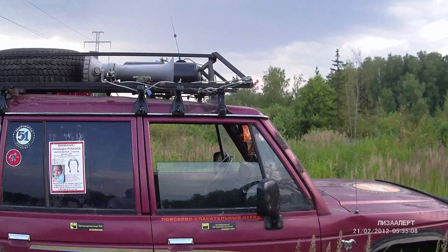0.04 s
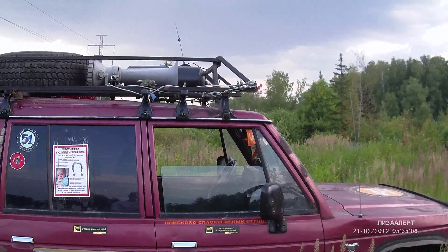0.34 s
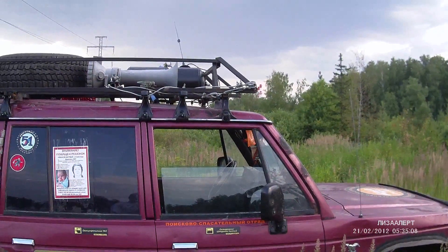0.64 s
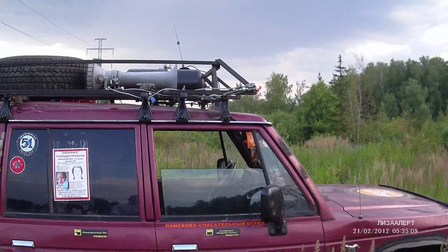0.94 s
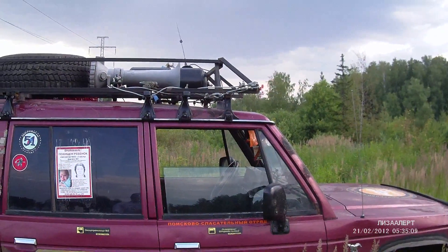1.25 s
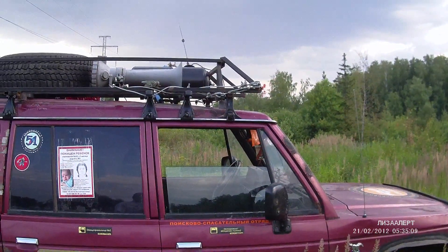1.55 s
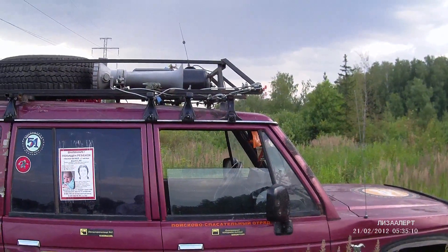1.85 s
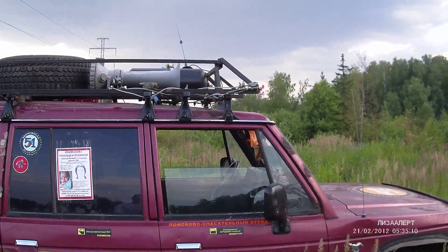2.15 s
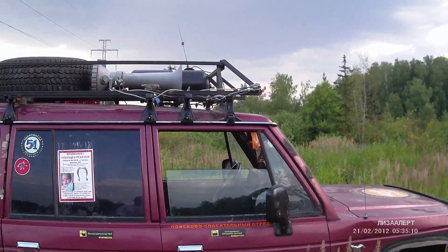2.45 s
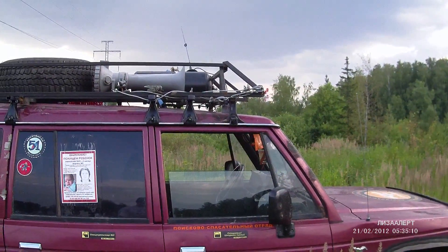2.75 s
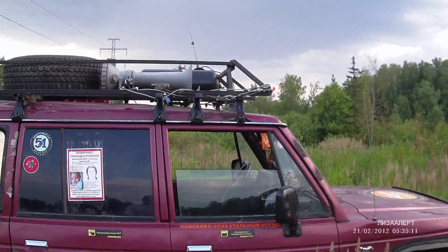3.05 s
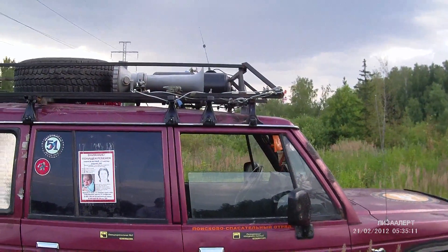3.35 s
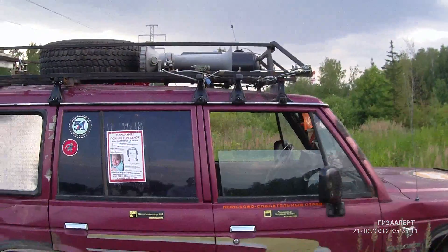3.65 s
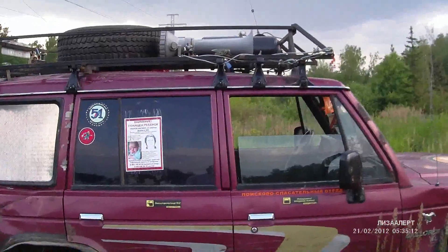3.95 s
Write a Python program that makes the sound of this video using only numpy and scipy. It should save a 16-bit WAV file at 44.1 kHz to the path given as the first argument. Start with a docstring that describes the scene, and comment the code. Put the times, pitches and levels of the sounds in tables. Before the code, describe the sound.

A very loud, low air horn blares from an off-road car, close and distorted. As its air runs out, the note sags into a weak hissing buzz and stops, leaving the diesel engine idling with light metal rattles outdoors.

```python
"""An air horn on the roof of an off-road car, close to the microphone in an open field, overloads it.
Its diaphragm chops the air; as the air runs down the note sags, breaks with a rasp,
drops into a weak hissing buzz and stops. The car's four-cylinder diesel idles underneath,
shaking loose metal, and is left knocking alone."""
import sys
import numpy as np
from scipy import signal
from scipy.fft import rfft, irfft
from scipy.io import wavfile
from scipy.ndimage import uniform_filter1d, map_coordinates

SR = 44100
rng = np.random.default_rng(int(sys.argv[2]) if len(sys.argv) > 2 else 0)


def to_wav(sig):
    """Store sig (one row per channel, or 1-D mono) as 16-bit WAV at the path in sys.argv[1].

    Samples outside -1..1 are clipped; the rate is SR.
    """
    pcm = np.clip(np.atleast_2d(sig), -1, 1) * 32767
    pcm = np.round(pcm).astype(np.int16)
    wavfile.write(sys.argv[1], SR, pcm.T)  # frames by channels


N = 176400
TIME = np.arange(N) / SR

# pitch of the diaphragm, which follows the air pressure: t/s, f/Hz
HORN_PITCH = [(0, 130.5), (.85, 130.3), (1.5, 129.2), (1.83, 128), (1.89, 127.1), (1.928, 120.4),
              (1.96, 110.3), (2.04, 109.2), (2.135, 104.2), (2.255, 103.9), (2.33, 100.6), (2.63, 99.3),
              (2.87, 96.7), (2.93, 94.3)]
# loudness of the horn: t/s, low overtones/dB, treble/dB
HORN_LEVEL = [(0, -1.5, -16.5), (1.3, -1.5, -14.5), (1.63, 0, -14), (1.83, 0.5, -10.5), (1.905, -6, -14),
              (1.945, -14.5, -23), (2.13, -21.5, -31), (2.21, -18.5, -26.5), (2.31, -21.5, -31),
              (2.68, -22.5, -31), (2.8, -25.5, -34.5), (2.9, -27, -35)]
# unsteadiness and escaping air: t/s, timing jitter/ms, hiss/dB
HORN_AIR = [(0, 0.0049, -29), (1.3, 0.0055, -27), (1.65, .012, -28), (1.84, .005, -23), (1.9, 0.02, -20.5),
            (1.945, 0.073, -18.5), (1.99, .018, -27), (2.2, .005, -28), (2.32, 0.018, -29.5),
            (2.5, .004, -33), (2.9, .009, -35)]
# the diaphragm's registers 0-5, from full pressure down, fundamental first: relative level/dB
FULL_DB = [2, -4.5, -4, -33, -10, -11, -16, -12.5, -15.5, -24, -29, -22.5, -21, -29, -19.5, -18]
EASING_DB = [1, -8.5, -2.5, -25.5, -23, -6.5, -12, -15.5, -14.5, -11, -19, -24, -19.5, -16, -26, -29]
SAGGING_DB = [0.5, -9.5, -0.5, -18.5, -11, -10.5, -10, -27, -20.5, -14.5, -33, -21, -26, -24, -21.5, -18.5]
STRAINED_DB = [1.5, -10, -0.5, -24, -11.5, -27, -22.5, -18.5, -24, -17.5, -23, -22, -15.5, -11, -19, -24]
SLACK_DB = [0, -13.5, -6.5, -4.5, -9, -3, -8, -6.5, -11, -8, -29, -9.5, -7.5, -10.5, -6.5, -2, -2, -7,
            -11.5]
SPENT_DB = [-3, -1.5, -16, -5, -21, -15, 1.5, -12, -3.5, -3, -2.5, -21, -11, -14, -9.5, -13, -6.5, -1.5, -8,
            -11, -12]
# the horn's path through them: t/s, register
REGISTER_PATH = [(.15, 0), (1.05, 1), (1.35, 2), (1.6, 3), (1.7, 3), (1.89, 2.5), (1.96, 4), (2.25, 4),
                 (2.32, 5)]
# outline of the treble overtones, blaring and dying: f/Hz, relative level/dB
BLARE_TREBLE = [(2190, -16), (2560, -2), (2980, -7.5), (3340, -4.5), (3950, -4.5), (4980, -6), (5840, -28),
                (6950, -10), (7900, -10), (8550, -9.5), (9290, -15), (15300, -16)]
BUZZ_TREBLE = [(2000, 0), (2370, -13), (2700, 1), (2960, -14), (3350, -4.5), (4080, -2), (4900, -13.5),
               (5800, -42), (7200, -10), (9400, -14), (10300, -5.5), (12000, -27.5), (13700, -6.5),
               (15300, -17)]
# a sharp ring that steps down through the overtones as the pressure falls: t/s, f/Hz, added level/dB
TREBLE_RING = [(.5, 4330, 3.5), (.95, 3890, 1), (1.27, 3630, 10.5), (1.52, 3216, 7), (1.82, 3300, 9),
               (1.93, 3340, -17)]
# air through the horn: f/Hz, relative level/dB
HISS_SPECTRUM = [(200, -2.5), (480, -7), (750, 0), (1300, -4.5), (1800, -1), (2500, -6), (3500, -2.5),
                 (4900, -6.5), (6000, -19), (7800, -4.5), (9400, -18), (12000, -26), (14000, -53)]
# horn resonances that flare as the note fails: t/s, half length/s, f/Hz, width/Hz, added level/dB
HORN_FLARES = [(1.45, 0.42, 8540, 900, 0), (1.6, 0.97, 4846, 110, 0), (1.893, 0.053, 845, 170, 8.5),
               (2.05, 0.059, 650, 80, 2), (2.26, 0.82, 3340, 65, 0)]

# the four cylinders: boom/dB, clatter/dB, tick/dB
CYLINDER_LEVELS = [(-50, -36.5, -42.5), (-45, -30, -39.5), (-29, -33, -40.5), (-54, -34, -42)]
# midrange and treble of a knock: f/Hz, relative level/dB
CLATTER_SPECTRUM = [(500, -33), (750, -3), (1250, 4.5), (1600, -0.5), (2100, 1), (2700, -12.5), (5000, -42)]
TICK_SPECTRUM = [(1200, -27), (2600, -5), (3300, 3.5), (4200, -12.5), (6000, -28), (8700, -8), (10300, -5),
                 (12000, -20), (14000, -4), (15300, -15)]
# steady wash of the running engine: f/Hz, relative level/dB
WASH_SPECTRUM = [(60, -32), (150, 8), (340, 2.5), (470, -9), (640, 2), (2100, -6.5), (2700, -13),
                 (4000, -19.5), (6000, -33.5), (10000, -18.5), (12000, -28), (14000, -23)]
# bright clanks of loose metal: t/s, level/dB
CLANK_HITS = [(2.312, -21), (3.201, -30.5), (3.354, -30.5), (3.505, -29.5), (3.81, -27.5), (3.961, -29)]
# resonances of that metal: f/Hz, width/Hz, gain/dB
METAL_MODES = [(1990, 450, -2), (10040, 440, -15.5), (14000, 600, -17)]

TREBLE_FROM_HZ, CUTOFF_HZ = 2150, 15400


def horn():
    """On the roof, close by: the diaphragm chops the air, and treble and hiss puff once a cycle."""
    stop_s, release_s, sputter_db = 2.885, 0.067, 1.65
    hz, = in_time(HORN_PITCH)
    low_db, treble_db = in_time(HORN_LEVEL)
    jitter_ms, hiss_db = in_time(HORN_AIR)
    slip_s = jitter_ms / 1000 * drift(rate_hz=310)
    cycles = np.cumsum(hz) / SR + hz * slip_s
    opening = -np.cos(2 * np.pi * cycles)
    low_heights, treble_heights = overtones()
    low = from_db(low_db) * play(low_heights, cycles)
    treble = from_db(treble_db) * play(treble_heights, cycles) * unit_rms(1 + 0.25 * opening)
    sputter = from_db(sputter_db * broken() * drift(rate_hz=15))
    hiss = from_db(hiss_db) * noise(HISS_SPECTRUM) * unit_rms(1 + 0.12 * opening)
    release = np.clip(1 - (TIME - stop_s) / release_s, 0, 1)
    return flare(sputter * (low + treble) + hiss) * release


def overtones(count=165, moments=200):
    """Low and treble overtones as the pressure falls: complex heights, overtones x moments."""
    ring_width_hz, smear_from_hz, smear_full_hz = 108, 330, 740
    ripple_db, ripple_rad, ripple_spacing_hz = 3.5, 0.44, 127
    t = np.linspace(0, N / SR, moments)
    hz = np.arange(1, count + 1)[:, None] * in_time(HORN_PITCH, t)[0]
    register, = in_time(REGISTER_PATH, t)
    low = 0
    for index, levels_db in enumerate((FULL_DB, EASING_DB, SAGGING_DB, STRAINED_DB, SLACK_DB, SPENT_DB)):
        heights = np.pad(from_db(levels_db), (0, count - len(levels_db)))
        low = low + unit_power(heights[:, None]) * np.maximum(1 - abs(register - index), 0)
    dying = broken(t)
    treble = from_db((1 - dying) * at_hz(BLARE_TREBLE, hz) + dying * at_hz(BUZZ_TREBLE, hz))
    treble *= (hz > TREBLE_FROM_HZ) & (hz < CUTOFF_HZ)
    ring_hz, ring_db = in_time(TREBLE_RING, t)
    treble *= 1 + from_db(ring_db) / (1 + (2 * (hz - ring_hz) / ring_width_hz) ** 2)
    # the sagging overtones slide through the bell's fine peaks and dips, drawn in 1 Hz steps
    swell, turn = drift(1 / ripple_spacing_hz, 1, (2, SR))[:, hz.astype(int)]
    treble *= from_db(ripple_db * swell)
    # the bell scatters the higher overtones over the cycle
    smear = np.clip((hz[:, :1] - smear_from_hz) / (smear_full_hz - smear_from_hz), 0, 1)
    phase = smear * (rng.uniform(-np.pi, np.pi, (count, 1)) + ripple_rad * turn) - np.pi / 2
    return [unit_power(part) * np.exp(1j * phase) for part in (low, treble)]


def broken(t=TIME):
    """0 while the note holds, 1 once it has dropped into the slack buzz."""
    return np.clip(in_time(REGISTER_PATH, t)[0] - 3, 0, 1)


def flare(plain):
    """Each resonance of the horn swells and fades on top of the plain sound."""
    out = plain
    for at_s, half_s, hz, width_hz, gain_db in HORN_FLARES:
        swell = np.exp(-((TIME - at_s) / half_s) ** 2)
        out = out + from_db(gain_db) * swell * resonate(plain, hz, width_hz)
    return out


def diesel():
    """Under the horn: each cylinder knocks in its own colour, booms the car and thumps the exhaust."""
    firing_s, interval_s, knock_lead_s = 3.2128, .03803, 0.013   # any one firing sets the beat
    knock_rise_s, knock_decay_s, slap_after_s = 0.0045, 0.0085, 0.0079
    boom_hz, wash_db = 224, -36.5
    thump_db, thump_width_s, low_cut_hz = -26.5, 0.0015, 13
    boom_db, clatter_db, tick_db = np.transpose(CYLINDER_LEVELS)
    ages = (TIME - firing_s + knock_lead_s - np.arange(4)[:, None] * interval_s) % (4 * interval_s)
    booms = burst(ages, rise_s=0.011, decay_s=0.017) * np.sin(2 * np.pi * boom_hz * ages)
    slaps = .6 * burst(ages - slap_after_s, knock_rise_s, knock_decay_s)   # a second contact
    knocks = np.hypot(burst(ages, knock_rise_s, knock_decay_s), slaps)
    wash = from_db(wash_db) * noise(WASH_SPECTRUM)
    clatter = noise(CLATTER_SPECTRUM) * (from_db(clatter_db) @ knocks)
    ticks = noise(TICK_SPECTRUM) * (from_db(tick_db) @ knocks)
    from_firing_s = (((TIME - firing_s) / interval_s + .5) % 1 - .5) * interval_s
    pulses = np.exp(-.5 * (from_firing_s / thump_width_s) ** 2)
    thumps = signal.lfilter(*signal.butter(1, low_cut_hz, "high", fs=SR), pulses - pulses.mean())
    return wash + from_db(boom_db) @ booms + clatter + ticks + from_db(thump_db) * thumps


def clanks():
    """Loose metal, shaken by the engine, chatters briefly in its three resonances."""
    hits = sum(from_db(db) * burst(TIME - at_s, rise_s=0.0047, decay_s=0.011) for at_s, db in CLANK_HITS)
    chatter = hits * rng.standard_normal(N)
    out = 0
    for hz, width_hz, db in METAL_MODES:
        mode = signal.butter(2, [hz - width_hz / 2, hz + width_hz / 2], "band", fs=SR, output="sos")
        out = out + from_db(db) * np.sqrt(SR / 2 / width_hz) * signal.sosfilt(mode, chatter + 1e-18)
    return out


def from_db(db):
    """Decibels to gain."""
    return 10 ** (np.asarray(db) / 20)


def unit_rms(x):
    """Scale a signal to rms 1."""
    return x / np.sqrt(np.mean(x ** 2) + 1e-20)


def unit_power(heights):
    """Scale overtone heights so that together they sound at rms 1 at each moment."""
    return heights / np.sqrt(np.sum(heights ** 2, axis=0) / 2 + 1e-20)


def in_time(rows, t=TIME):
    """The columns of a curve at the given times."""
    times, *columns = np.transpose(rows)
    return [np.interp(t, times, column) for column in columns]


def at_hz(spectrum, hz):
    """A spectrum in dB at the given frequencies."""
    points_hz, db = np.transpose(spectrum)
    return np.interp(np.log(hz + 1e-9), np.log(points_hz), db)


def noise(spectrum):
    """Noise of rms 1 in a given colour, falling away outside its range."""
    hz = np.arange(N // 2 + 1) * SR / N + 1e-3
    skirts = 1 / (1 + (hz / spectrum[-1][0] / 2) ** 4) / (1 + (spectrum[0][0] / hz / 2) ** 4)
    return unit_rms(irfft(rfft(rng.standard_normal(N)) * skirts * from_db(at_hz(spectrum, hz)), N))


def drift(rate_hz, steps_per_s=SR, shape=(N,)):
    """Smooth random wander of rms 1 along the last axis."""
    length = shape[-1]
    hz = np.arange(length + 1) * steps_per_s / (2 * length)
    white = rng.standard_normal(shape[:-1] + (2 * length,))
    return unit_rms(irfft(rfft(white) / (1 + (hz / rate_hz) ** 2))[..., :length])


def play(heights, cycles, size=2048):
    """Sound a changing set of overtones along a running count of cycles."""
    shapes = irfft(np.pad(heights, ((1, 0), (0, 0))), size, axis=0) * size / 2
    moments = np.linspace(0, heights.shape[1] - 1, N)
    return map_coordinates(np.vstack([shapes, shapes[:1]]), [cycles % 1 * size, moments], order=1)


def burst(age, rise_s, decay_s):
    """Quick rise and exponential fall."""
    return np.clip(age / rise_s, 0, 1) * np.exp(-np.maximum(age - rise_s, 0) / decay_s)


def resonate(x, hz, width_hz):
    """The band that one resonance passes."""
    return signal.lfilter(*signal.iirpeak(hz, hz / width_hz, fs=SR), x)


def scene():
    """The car stands close, straight ahead; the bass reaches mainly the left microphone."""
    bass_below_hz = 143
    car = horn() + diesel() + clanks()
    bass = signal.lfilter(*signal.butter(1, bass_below_hz, fs=SR), car)
    return np.array([car + bass, car - bass])


def record(dry):
    """A limiter holds the blast down, yet the left channel overloads; the treble is notched, the top cut."""
    limit_db, window_s, left_offset = -6.5, 0.032, .045
    window = int(window_s * SR)
    power = uniform_filter1d(dry.mean(axis=0) ** 2, window)
    excess = np.maximum(power / from_db(limit_db) ** 2, 1)
    gain = uniform_filter1d(1 / np.sqrt(excess), window)
    limited = gain * dry + np.array([[left_offset], [0]])
    clipped = limited / (1 + limited ** 20) ** (1 / 20)   # nearly hard, at full scale
    notched = clipped - 0.17 * resonate(clipped, hz=6200, width_hz=860)
    return signal.sosfilt(signal.ellip(12, .1, 70, CUTOFF_HZ, fs=SR, output="sos"), notched)


dry = scene()
out = record(dry)
to_wav(out)
```